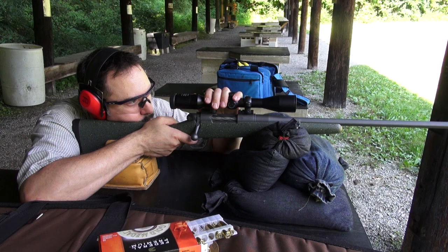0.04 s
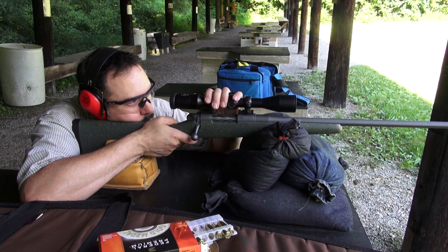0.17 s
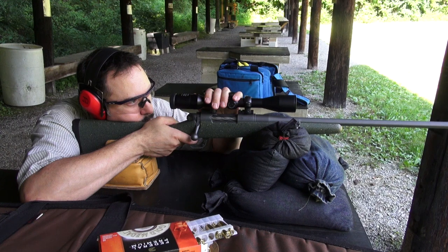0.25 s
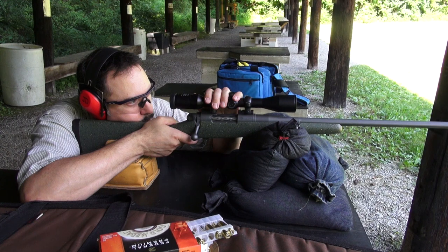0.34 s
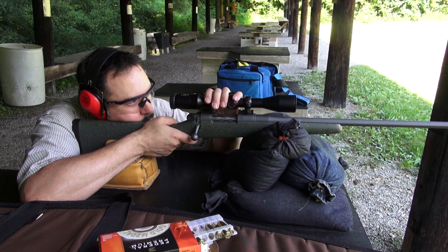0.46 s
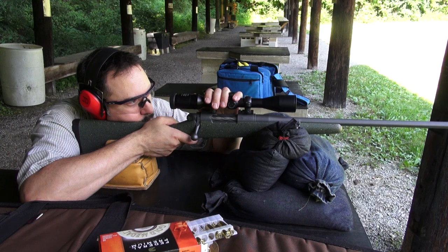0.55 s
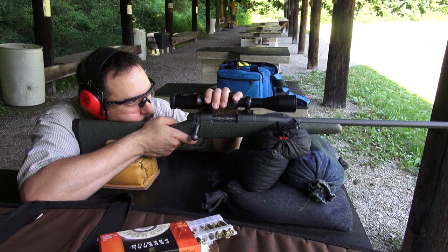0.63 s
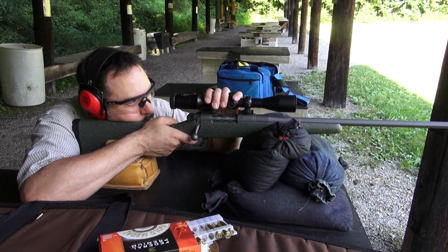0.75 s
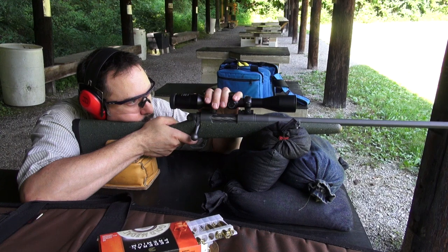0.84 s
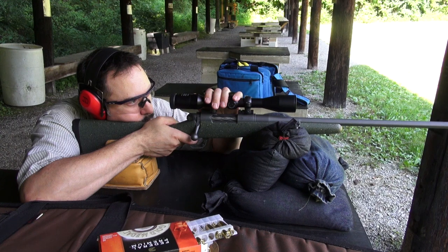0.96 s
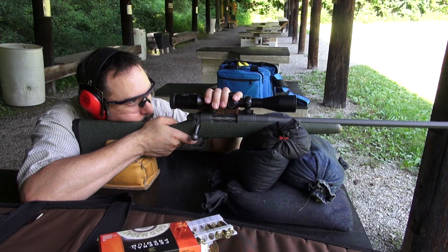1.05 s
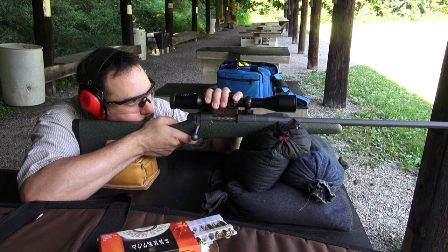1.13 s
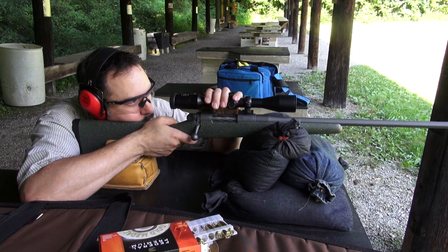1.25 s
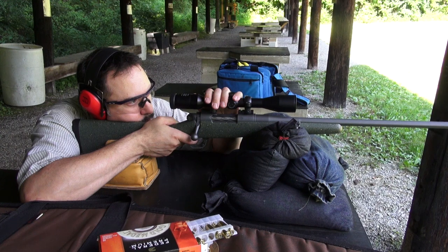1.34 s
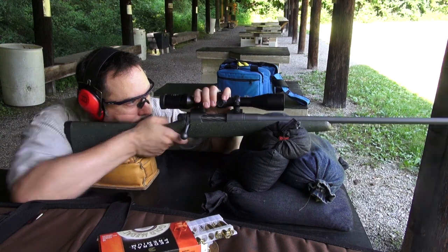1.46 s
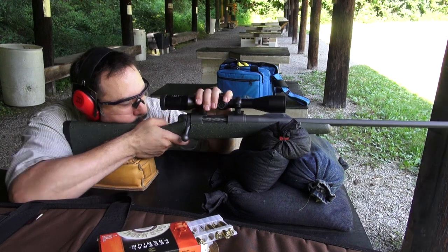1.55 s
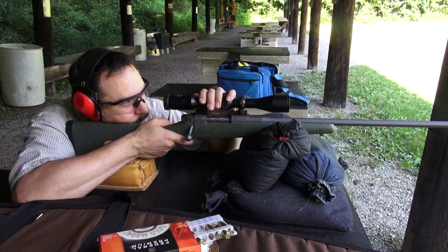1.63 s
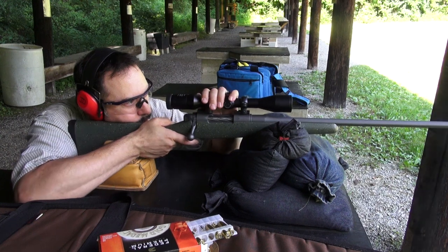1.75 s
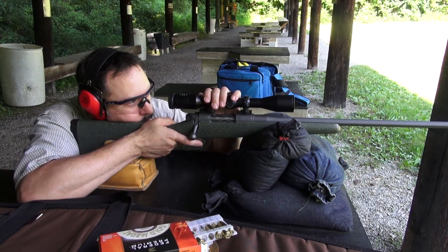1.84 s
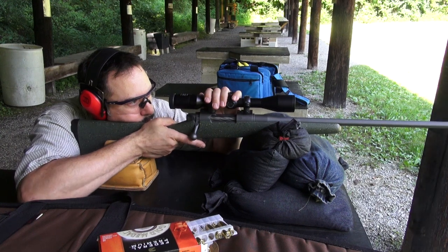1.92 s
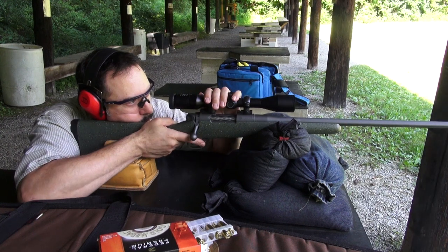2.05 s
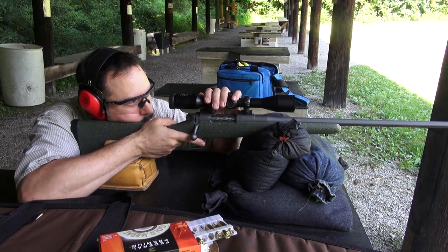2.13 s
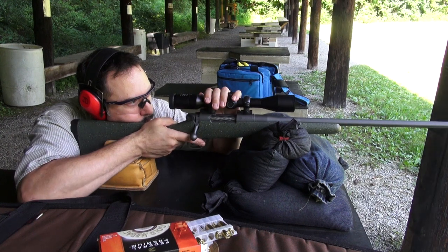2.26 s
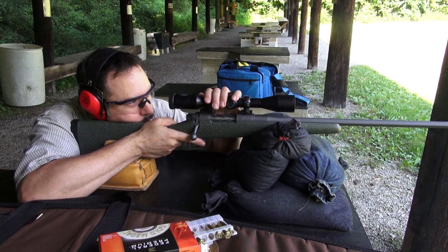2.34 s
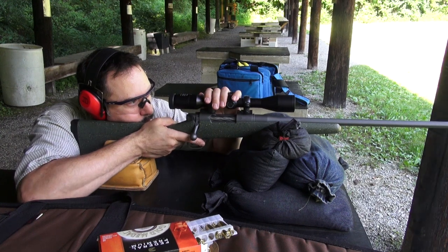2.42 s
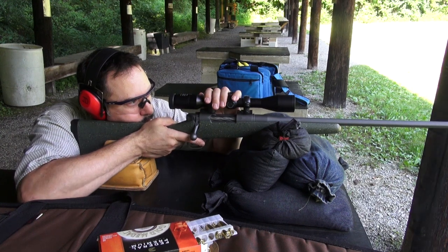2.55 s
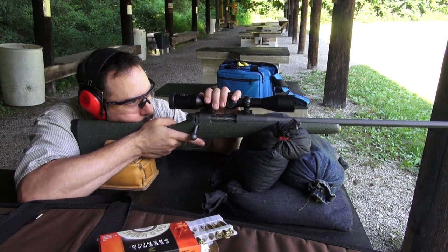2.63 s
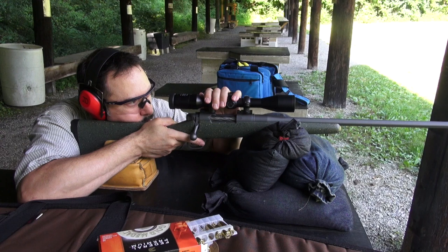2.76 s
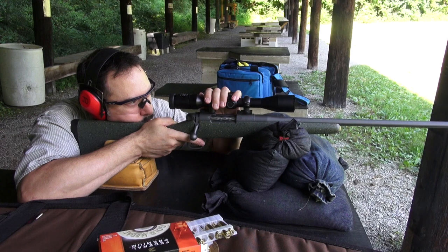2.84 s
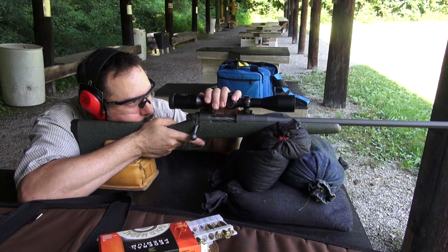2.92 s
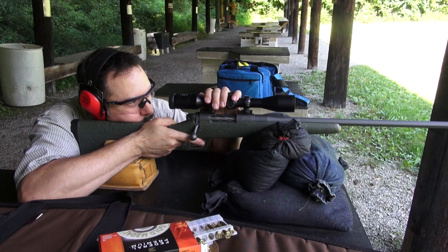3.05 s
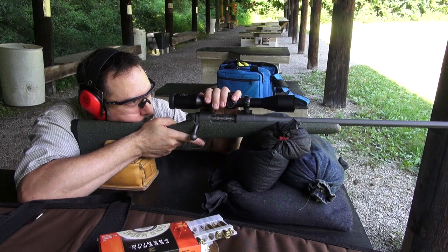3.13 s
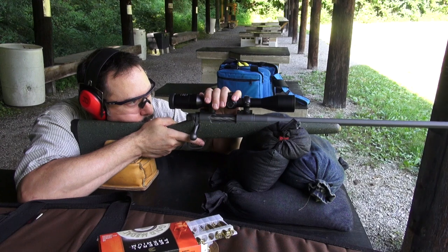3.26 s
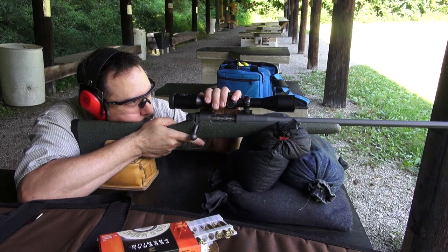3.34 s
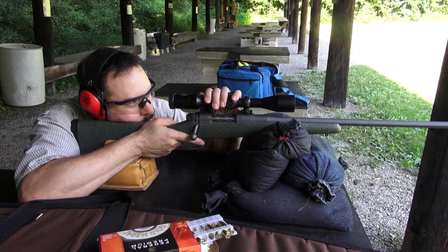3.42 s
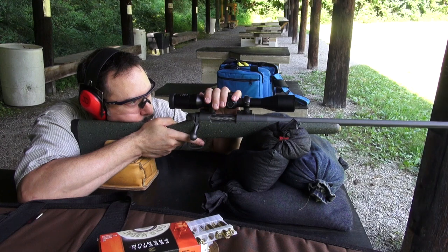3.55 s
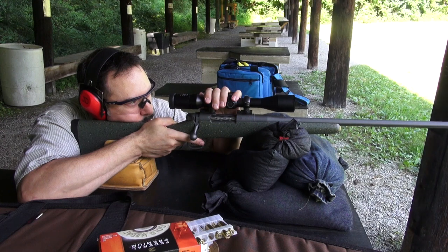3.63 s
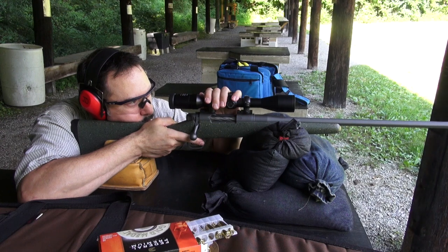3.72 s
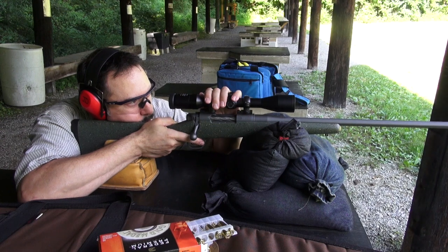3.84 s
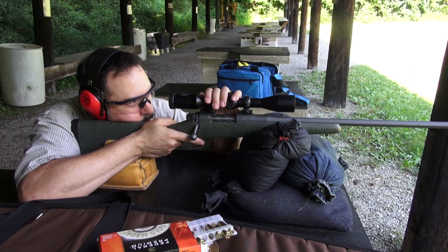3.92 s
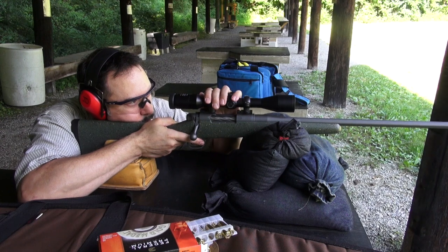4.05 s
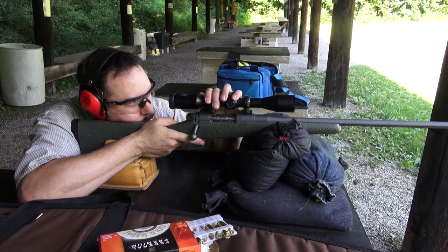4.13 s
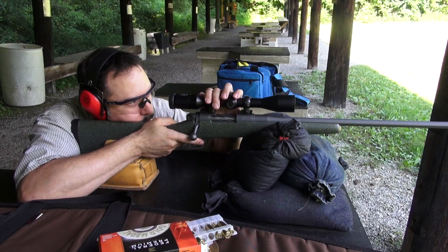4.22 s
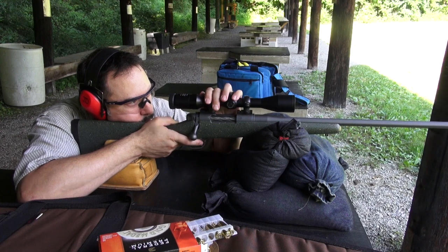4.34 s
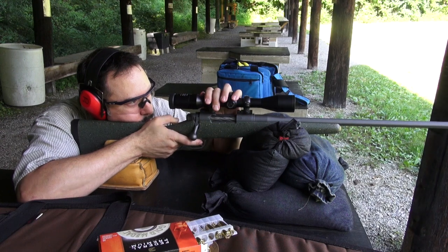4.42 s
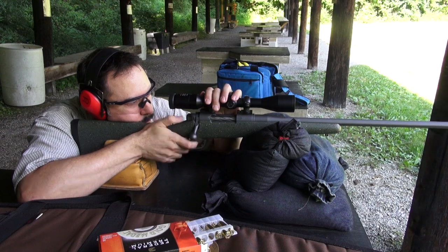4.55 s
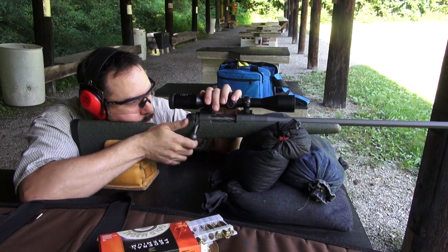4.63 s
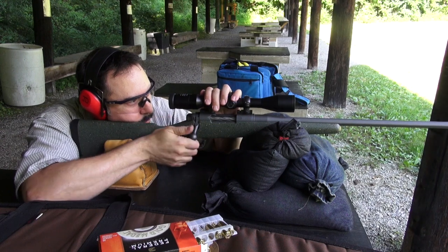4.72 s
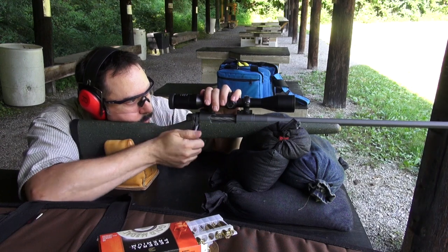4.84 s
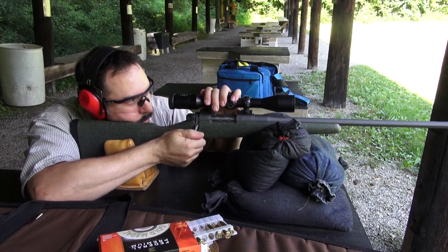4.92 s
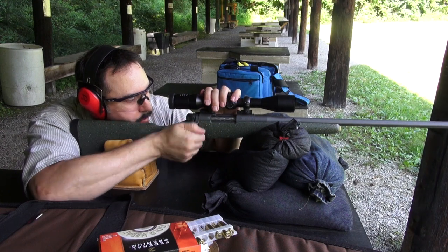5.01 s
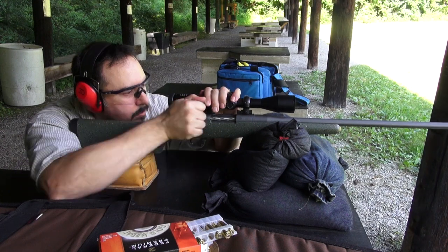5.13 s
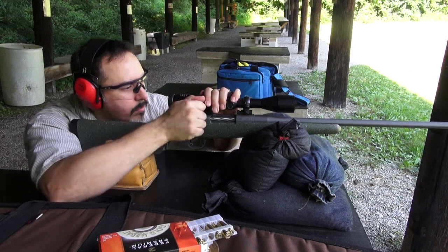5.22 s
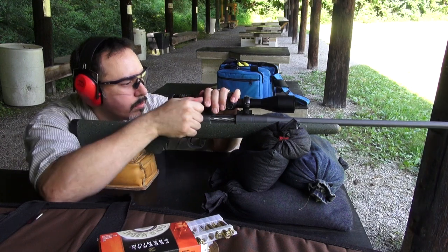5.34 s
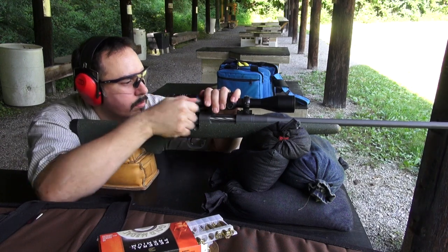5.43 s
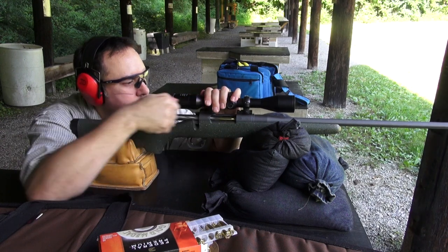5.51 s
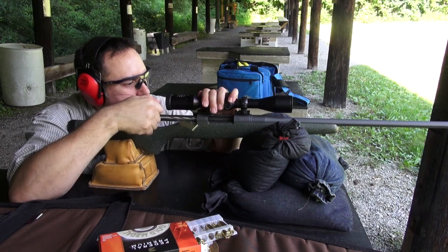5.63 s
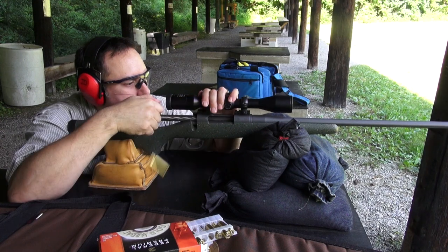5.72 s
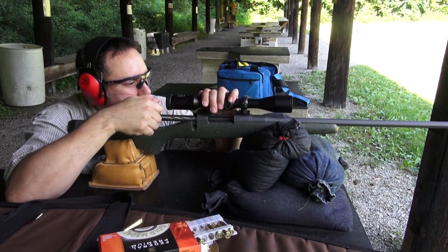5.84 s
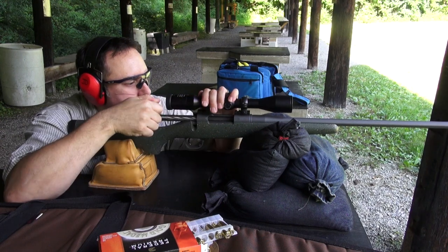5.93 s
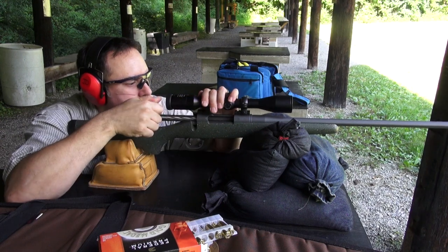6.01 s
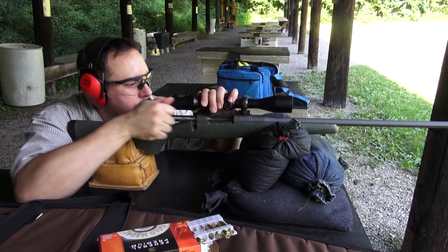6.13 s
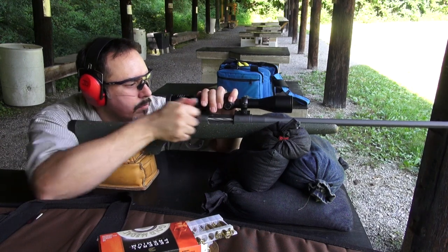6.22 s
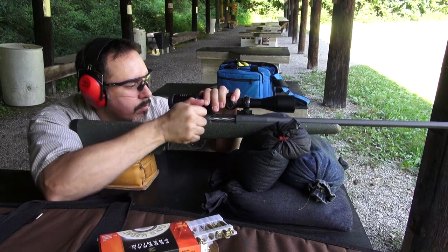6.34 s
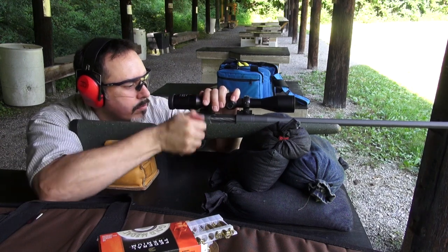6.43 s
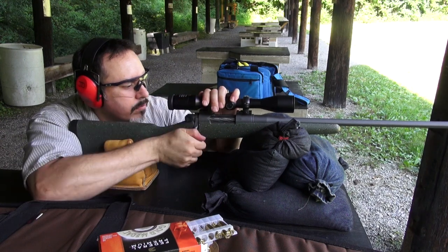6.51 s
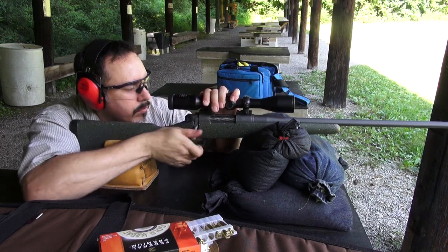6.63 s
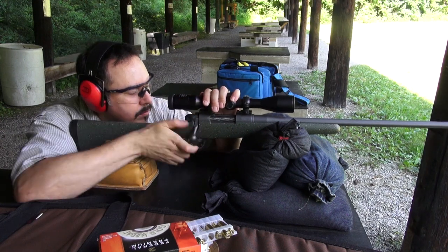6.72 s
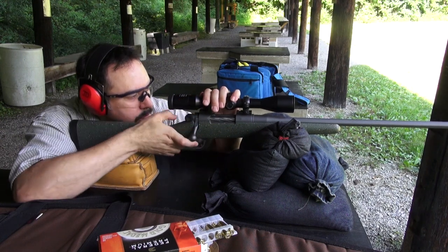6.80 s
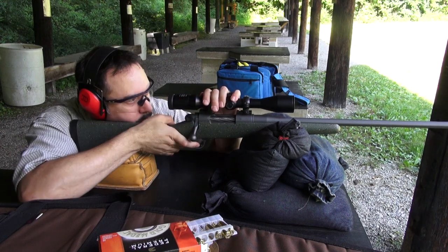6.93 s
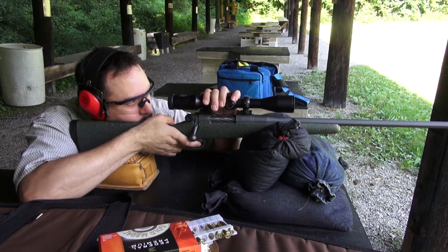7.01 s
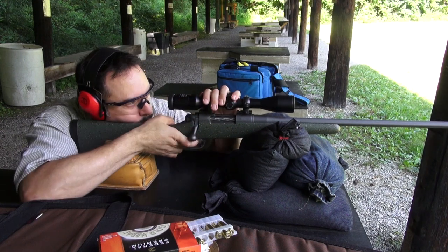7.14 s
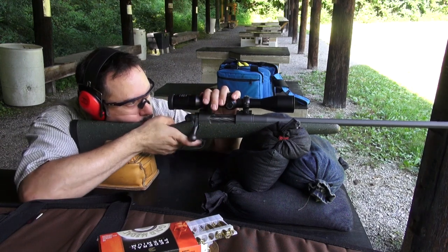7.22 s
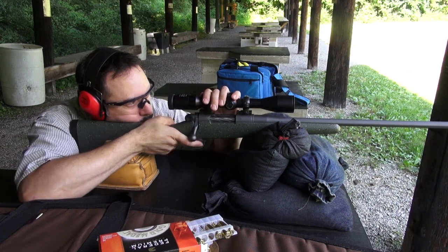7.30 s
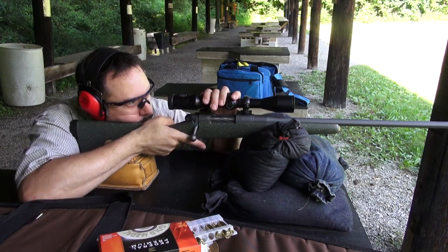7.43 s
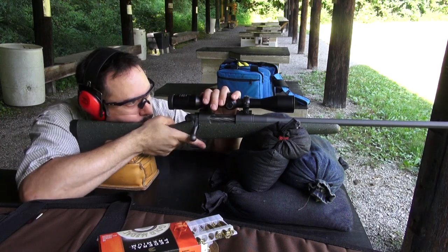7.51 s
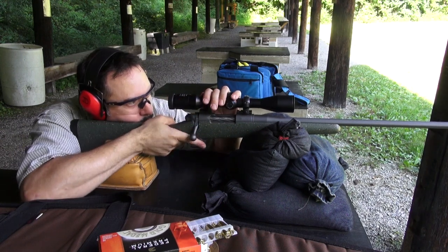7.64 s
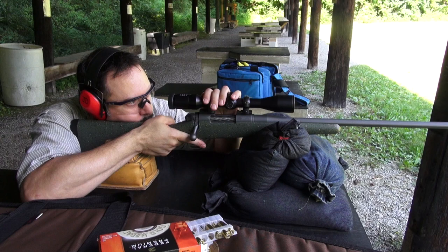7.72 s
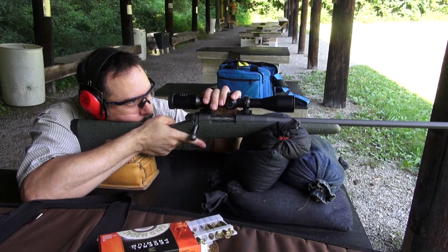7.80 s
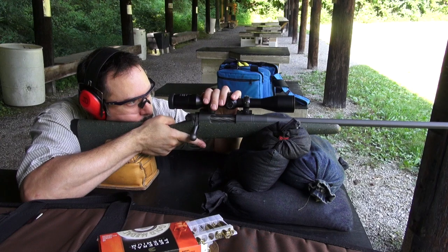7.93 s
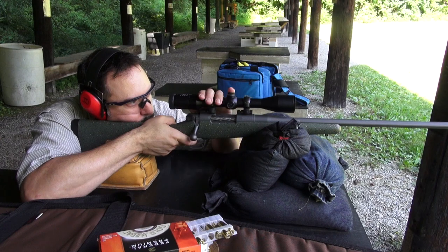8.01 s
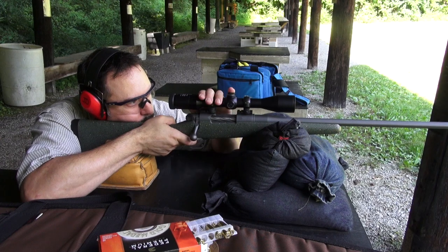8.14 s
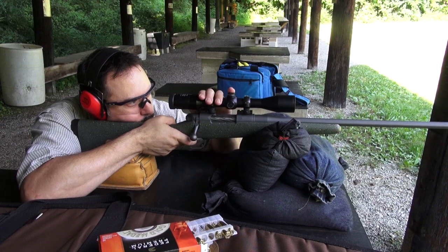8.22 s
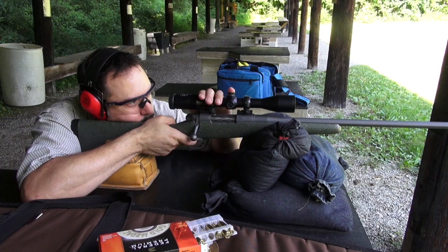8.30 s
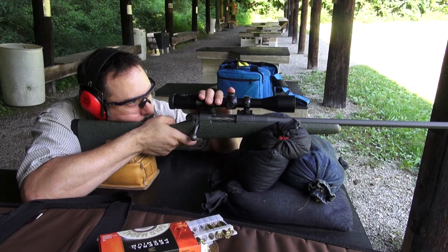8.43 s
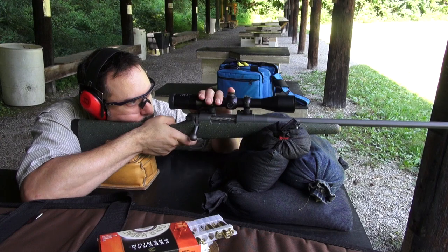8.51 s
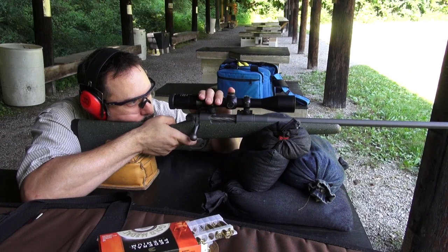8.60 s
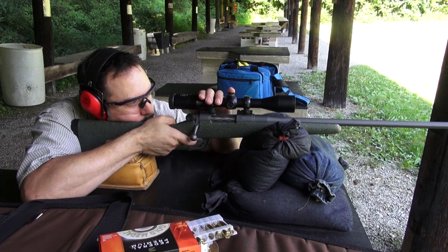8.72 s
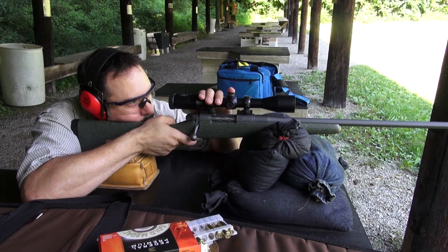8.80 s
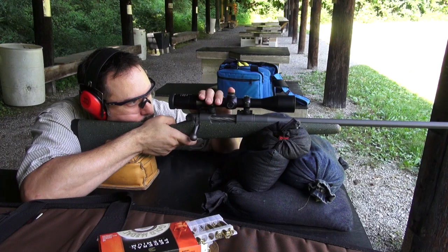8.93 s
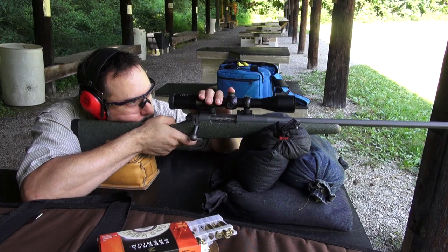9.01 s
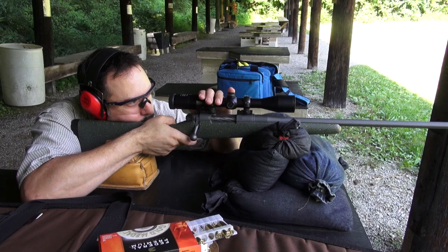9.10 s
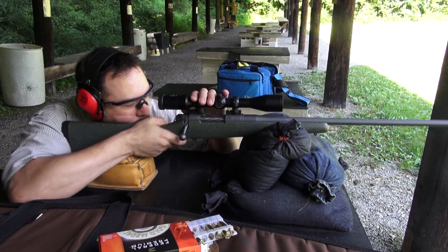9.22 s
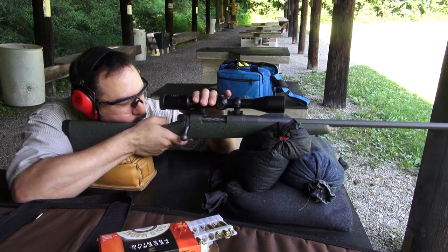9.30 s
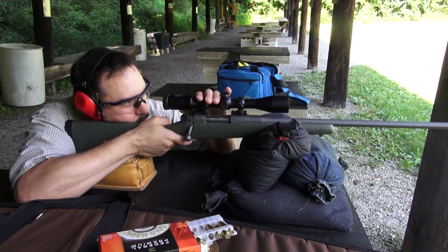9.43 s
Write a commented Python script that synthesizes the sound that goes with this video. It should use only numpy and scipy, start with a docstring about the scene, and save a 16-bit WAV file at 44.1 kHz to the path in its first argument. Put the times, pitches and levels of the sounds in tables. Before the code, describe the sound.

Two loud rifle shots echo across an outdoor range, with metallic clacks of the bolt being worked between them.

```python
"""A faint summer hiss, then a rifle shot from a bench under the roof of an outdoor range.
The blast overloads the microphone, fills the shelter and rolls back from the berm and the woods;
the gain control ducks the hiss and lets it creep back. The bolt is worked: impacts and friction
excite the modes of the steel action, and the spent brass case rings out and bounces on the bench.
A second shot follows."""
import sys
import numpy as np
from scipy import signal
from scipy.fft import rfft, irfft, next_fast_len
from scipy.io import wavfile
from scipy.ndimage import uniform_filter1d

SR = 44100
rng = np.random.default_rng(int(sys.argv[2]) if len(sys.argv) > 2 else 0)


def int16_out(signal):
    """Quantize to a 16-bit WAV file."""
    q = np.round(np.clip(np.atleast_2d(signal).T, -1, 1) * 32767)
    wavfile.write(sys.argv[1], SR, q.astype(np.int16))


N = 417186
T = np.arange(N) / SR

# hard tick of a metal contact: (frequency [Hz], relative level [dB])
TICK_SPECTRUM = [(4000, -31), (8000, -1.5), (10000, -2.5), (15500, -5)]
# dull thud of the stock: (frequency [Hz], relative level [dB])
THUD_SPECTRUM = [(30, -36), (150, -31), (350, -8.5), (650, 6), (1100, -6), (2000, -7), (5000, -37)]
# the bolt's travel, back then forward: (start [s], time of top speed [s], level then [dB])
BOLT_STROKES = [(5.536, 5.645, -39.5), (6.184, 6.266, -31)]


def amp(db):
    """Decibels to amplitude ratio."""
    return 10 ** (np.asarray(db) / 20)


def unit(x):
    """Normalise to rms 1."""
    return x / np.sqrt(np.mean(x ** 2) + 1e-20)


def unit_click(x):
    """Normalise to the energy of 3 ms at rms 1."""
    return x / np.sqrt(np.sum(x ** 2) / (SR * .003))


def along(points, hz):
    """Interpolate (frequency [Hz], value) points on a logarithmic frequency axis."""
    f, v = np.transpose(points)
    return np.interp(np.log(hz + 1), np.log(f + 1), v)


def add(track, s, x):
    """Superposition: sum x into the track at s seconds."""
    part = track[max(round(s * SR), 0):][:len(x)]
    part += x[:len(part)]


def filtered(x, response):
    """Linear filtering: multiply the spectrum by a frequency response."""
    n = x.shape[-1]
    m = next_fast_len(n + 4096)
    return irfft(rfft(x, m) * response(np.fft.rfftfreq(m, 1 / SR)), m)[..., :n]


def noise(spectrum, size):
    """Spectral shaping: coloured noise of rms 1."""
    return unit(filtered(rng.standard_normal(size), lambda hz: amp(along(spectrum, hz))))


def damped(x, t60s):
    """Frequency-dependent damping: each band decays exponentially at its own rate."""
    hz, t, bands = signal.stft(x, SR, nperseg=512)
    decay = amp(-60 * t / np.maximum(along(t60s, hz), .01)[:, None])
    return signal.istft(bands * decay, SR, nperseg=512)[1][:len(x)]


def resonance(hz, centre, width):
    """Response of a damped oscillator, gain 1 at its centre."""
    return 1j * hz * width / (centre ** 2 - hz ** 2 + 1j * hz * width)


def strike(t60, attack=0.00053):
    """Impact envelope: a fast rise, then free exponential decay."""
    t = np.arange(SR // 5) / SR
    return amp(-60 * t / t60) * (1 - np.exp(-t / attack))


def catches(rate):
    """Poisson process: random impulses, on average `rate` a second, at rms 1."""
    return unit((rng.random(N) < rate / SR) * rng.standard_normal(N))


def summer_air(start_db=-65, fade_db_per_s=0.43):
    """Ambient noise: a thin, high hiss that slowly fades."""
    # (frequency [Hz], relative level [dB])
    spectrum = [(100, -7.5), (600, -10), (1100, -13.5), (2000, -18), (2600, -5.5), (3200, -2.5), (5800, -2),
                (7000, 2.5), (7800, -6), (9000, -23), (13000, -28)]
    return amp(start_db - fade_db_per_s * T) * noise(spectrum, N)


def electronics(noise_db=-78):
    """Self-noise of the microphone's circuit: a broadband floor and a steady buzz."""
    # noise floor: (frequency [Hz], relative level [dB])
    floor = [(20, -7), (50, 1.5), (100, -3), (200, -6), (400, -5.5), (700, -8), (850, -4.5), (1100, -10),
             (2000, -12), (9000, -17), (15500, -19.5)]
    # buzz: (frequency [Hz], rms level [dB])
    partials = [(100.3, -86), (150.45, -86), (200.6, -90), (250.75, -93), (845, -95), (13378, -93)]
    buzz = sum(amp(db) * np.sqrt(2) * np.cos(2 * np.pi * hz * T) for hz, db in partials)
    return amp(noise_db) * noise(floor, N) + buzz


def action(hz):
    """Modal response of the steel receiver and bolt, summed with alternating signs."""
    # (frequency [Hz], bandwidth [Hz], level [dB])
    modes = [(1140, 320, -7), (1610, 380, -3.5), (2030, 360, -0.5), (3013, 360, 0.5), (3750, 470, -0.5),
             (4516, 580, 3), (5160, 1100, -2.5), (6747, 700, -3.5), (8600, 900, -10.5)]
    return sum((-1) ** k * amp(db) * resonance(hz, c, w) for k, (c, w, db) in enumerate(modes))


def handling(start=4.55, end=6.5, db=-73, rise_db=12, tick_rate=160, stock_db=-2):
    """Impulse excitation: fingers and loose parts tick on action and stock as the hand takes hold."""
    grip_db = np.interp(T, [start, BOLT_STROKES[0][0]], [db - rise_db, db])
    ticks = filtered(catches(tick_rate), lambda hz: action(hz) + amp(stock_db + along(THUD_SPECTRUM, hz)))
    return amp(grip_db) * (T > start) * (T < end) * unit(ticks)


def bolt_slide(catch_rate=1200, smooth=0.42, tick_db=-17, stock_db=-8, rise_db=22, stop_db_per_s=448):
    """Sliding friction: tiny catches of steel excite action and stock, louder as the bolt speeds up."""
    travel = np.zeros(N)
    for start, fastest, db in BOLT_STROKES:
        swell_db = np.interp(T, [start, fastest], [-rise_db, 0])
        stop_db = stop_db_per_s * np.maximum(T - fastest, 0)
        travel += (T > start) * amp(db + swell_db - stop_db)
    friction = catches(catch_rate) + smooth * rng.standard_normal(N)
    rub = filtered(friction, lambda hz: action(hz) + amp(tick_db + along(TICK_SPECTRUM, hz))
                   + amp(stock_db + along(THUD_SPECTRUM, hz)))
    return travel * unit(rub)


def knock(hz, t60, thud_db):
    """Heavily damped vibration: one low mode over the thud of the stock or bench."""
    blow = strike(t60, attack=0.0013)
    tone = np.sin(2 * np.pi * hz * np.arange(len(blow)) / SR)
    thud = noise(THUD_SPECTRUM, len(blow))
    return unit_click(unit_click(tone * blow) + amp(thud_db) * unit_click(thud * blow))


def clack(ring_db, tick_db, knock_db):
    """Hard impact: one contact gives a brief metallic ring, a tick and a knock."""
    ring = unit_click(filtered(rng.standard_normal(SR // 5) * strike(t60=0.017), action))
    tick = unit_click(noise(TICK_SPECTRUM, SR // 5) * strike(t60=0.0099))
    knock_hz = 1019 * np.exp(.14 * rng.standard_normal())  # varies with the spot that is hit
    body = knock(knock_hz, t60=.024, thud_db=-3)
    return amp(ring_db) * ring + amp(tick_db) * tick + amp(knock_db) * body


def case_ring(tumble_hz=33, tumble_depth=0.55, split_hz=11000):
    """Free vibration of the ejected brass case, modulated by its directivity as it tumbles."""
    # (frequency [Hz], level [dB], decay time T60 [s])
    modes = [(9819, 0, .34), (12800, -24, .22), (14380, -12, .24), (14470, 0, .16)]
    # blows to the case: (time [s], level below split_hz [dB], level above [dB])
    blows = [(5.613, -31, -52), (5.634, -45, -37), (5.672, -46, -22), (5.884, -60, -72)]
    out = np.zeros(N)
    for hz, db, t60 in modes:
        energy = np.zeros(N)
        for s, low_db, high_db in blows:
            blow_db = low_db if hz < split_hz else high_db
            add(energy, s, amp(blow_db + db - 60 * T[:SR // 2] / t60) ** 2)
        # two radiation lobes sweep past in each turn
        facing = np.abs(np.cos(2 * np.pi * (tumble_hz * T + rng.random())))
        out += np.sqrt(energy) * facing ** tumble_depth * np.sin(2 * np.pi * hz * T)
    return out


def case_bounces(start=5.977, db=-30.5, hop_s=.0167, loss_db=5):
    """Inelastic collisions: the case hits the bench three times at even intervals, each time weaker."""
    out = np.zeros(N)
    for k in range(3):
        bench = knock(hz=620, t60=0.015, thud_db=-3.5)
        metal = clack(ring_db=-21, tick_db=-40, knock_db=-12)
        add(out, start + k * hop_s, amp(db - k * loss_db) * (bench + metal))
    return out


def reload_impacts(rebound_s=.003, rebound_db=-11, chatter_s=.0085, scatter_db=1.5):
    """Impact and elastic rebound: clicks of the bolt and of the brass case landing, rattles and bumps."""
    # clicks of bolt and case: (time [s], ring [dB], tick [dB], knock [dB])
    contacts = [(5.059, -45.5, -60, -63), (5.0848, -54, -47, -51), (5.161, -39, -44, -56),
                (5.181, -50, -70, -46), (5.188, -26, -36, -43), (5.1971, -24, -29.5, -33.5),
                (5.467, -61, -56, -64), (5.536, -29, -42, -39), (5.6422, -17.5, -21, -21.5),
                (5.6712, -36.5, -47, -60), (5.8653, -48, -65, -46.5), (5.8836, -43.5, -49, -42),
                (6.168, -57.5, -53, -72), (6.187, -31, -37, -46), (6.2003, -34, -53.5, -48),
                (6.244, -33, -52, -46), (6.2678, -22, -22, -37.5), (6.271, -24.5, -20, -42),
                (6.3134, -33, -53, -48), (6.3293, -10.5, -14, -25.5), (6.483, -38, -65, -46),
                (6.572, -27, -33, -39.5)]
    # brass chatters on its way out and in: (time [s], duration [s], ring [dB], tick [dB], knock [dB])
    rattles = [(5.613, .026, -27, -31.5, -43.5), (6.256, .014, -24.5, -23.5, -39),
               (6.285, .014, -30.5, -45, -43)]
    # the handle knocks the stock at each end of its swing: (time [s], level [dB])
    handle_stops = [(5.2, -33), (6.572, -28.5)]
    # soft bumps on stock, rest and mat: (time [s], level [dB], frequency [Hz], decay time T60 [s])
    bumps = [(4.57, -66, 450, .04), (5.089, -46, 584, 0.031), (5.498, -52, 900, .07),
             (5.866, -56, 330, 0.045), (5.883, -29, 420, 0.025), (6.331, -44, 90.2, 0.039),
             (6.62, -65, 56, 0.26), (7.12, -59.5, 380, 0.043)]
    out = np.zeros(N)
    for s, *levels in contacts:
        add(out, s, clack(*levels))
        add(out, s + rebound_s, amp(rebound_db) * clack(*levels))
    for s, duration, *levels in rattles:
        for k in range(round(duration / chatter_s)):
            add(out, s + k * chatter_s, amp(scatter_db * rng.standard_normal()) * clack(*levels))
    for s, db in handle_stops:
        add(out, s, amp(db) * knock(hz=616, t60=0.032, thud_db=-7))
    for s, db, hz, t60 in bumps:
        band = unit(filtered(rng.standard_normal(SR // 5), lambda f: resonance(f, hz, hz / 2) ** 2))
        add(out, s, amp(db) * band * strike(t60))
    return out


def shelter(x, roof_db=-16, bench_db=-19, bench_delay=0.012, bench_t60=0.012, block=4096):
    """Short bench reflection and roof reverberation, with a fresh random tail for each block."""
    # reverberation under the roof: (frequency [Hz], decay time T60 [s])
    roof_t60 = [(200, 0.31), (1000, 0.35), (5000, 0.22), (14000, 0.15)]
    roof_spectrum = [(100, 0), (700, -3.5), (4500, 1.5), (9000, 0.5), (15000, 4.5)]
    out, t = x.copy(), np.arange(SR // 3) / SR
    for start in range(0, N, block):
        part = x[start:start + block]
        if np.abs(part).max() < 1e-3:
            continue
        roof = damped(noise(roof_spectrum, len(t)), roof_t60) * (1 - np.exp(-t / 0.00115))
        bench = rng.standard_normal(len(t)) * amp(-60 * t / bench_t60)
        echo = amp(roof_db) * roof / np.linalg.norm(roof)
        add(echo, bench_delay, amp(bench_db) * bench / np.linalg.norm(bench))
        add(out, start / SR, signal.fftconvolve(part, echo))
    return out


def microphone_recovery(t, db=-45, t60=1.7):
    """Overload recovery: a slow subsonic swell that dies away as the microphone settles."""
    spectrum = [(12, 0), (30, -12), (60, -24), (200, -30.5), (600, -69.5)]
    return amp(db - 60 * t / t60) * noise(spectrum, len(t))


def blast_tail(t, blast_db=14, berm_db=-7, berm_delay=.078, berm_swell_s=.045,
               woods_db=-20, woods_rise_s=0.074):
    """Reflection and scattering from roof, berm and woods, plus the microphone's recovery."""
    # roar under the roof, berm echo, roll in the woods: (frequency [Hz], relative level [dB])
    blast_spectrum = [(30, -19), (70, -17.5), (130, -9.5), (300, -0.5), (520, -1), (850, 0), (1400, -6),
                      (2500, -7.5), (5000, -9), (8000, -16), (15000, -27)]
    berm_spectrum = [(30, -20), (70, -40), (120, -13), (220, -10.5), (350, -6), (750, -5.5), (1100, -10),
                     (2000, -15), (4500, -20.5), (8000, -30.5), (15000, -43)]
    woods_spectrum = [(30, -22), (120, -13.5), (270, -17.5), (420, -7.5), (560, -1.5), (900, -5.5),
                      (2000, -8), (4500, -18), (9000, -35)]
    # their damping: (frequency [Hz], decay time T60 [s])
    blast_t60 = [(100, 0.13), (700, 0.23), (4000, 0.18), (14000, 0.16)]
    berm_t60 = [(100, 0.53), (600, 0.87), (3000, 1), (7000, 1), (14000, 0.72)]
    woods_t60 = [(150, 1.6), (600, 2.33), (1500, 1.85), (3500, 1.6), (9000, .9)]
    # standing waves between bench, floor and roof: (frequency [Hz], bandwidth [Hz], gain [dB])
    bay_modes = [(345, 13, 2.5), (450, 120, 3.5), (595, 26, 3), (672.6, 54, 2.5), (764, 26, 3),
                 (884, 12, 2), (1070, 13, 4), (1264, 20, 5), (1723, 20, 3), (3060, 25, 5.5)]
    roar = damped(noise(blast_spectrum, len(t)), blast_t60)
    roll = damped(noise(woods_spectrum, len(t)), woods_t60) * (1 - np.exp(-t / woods_rise_s))
    out = amp(blast_db) * roar + amp(woods_db) * roll + microphone_recovery(t)
    # the echo swells as the slope answers part by part
    echo = damped(noise(berm_spectrum, len(t)), berm_t60) * np.minimum(t / berm_swell_s, 1)
    add(out, berm_delay, amp(berm_db) * echo)
    return filtered(out, lambda hz: 1 + sum((amp(db) - 1) * resonance(hz, c, w) for c, w, db in bay_modes))


def shots(crack_db=16, crack_t60=0.044, pin_db=-20, pin_t60=0.028, pin_lead_s=0.0029):
    """Impulsive source: the firing pin rings the action, then the muzzle crack excites the range."""
    # (time [s], level [dB])
    firings = [(1.5198, 2), (9.2613, 3)]
    crack_spectrum = [(200, -9.5), (1500, -2.5), (6000, 1.0), (15000, -17.5)]
    out, t = np.zeros(N), np.arange(3 * SR) / SR
    tail = blast_tail(t)  # rifle and microphone stay put, so both shots share it
    for s, db in firings:
        pin = unit(filtered(rng.standard_normal(len(t)), action)) * amp(pin_db - 60 * t / pin_t60)
        add(out, s - pin_lead_s, pin)
        crack = noise(crack_spectrum, len(t)) * amp(crack_db - 60 * t / crack_t60)
        add(out, s, amp(db) * (crack + tail))
    return out


def scene():
    """Superposition: all sources reach the two close microphone ports alike."""
    gunfire = shots()
    reloading = shelter(reload_impacts() + case_bounces() + bolt_slide() + handling())
    mid = gunfire + reloading + case_ring() + summer_air()
    return np.array([mid, mid])


def record(dry, overload_db=6, hardness=4, low_cut_hz=110, threshold_db=-7, attack_s=.009,
           release_db_per_s=3.0, ceiling=0.7, side_db=-22, top_hz=16000):
    """Nonlinear transduction: the microphone saturates, the gain control ducks, the converter clips."""
    x = dry.mean(axis=0)
    x = x / (1 + np.abs(x / amp(overload_db)) ** hardness) ** (1 / hardness)
    x = filtered(x, lambda hz: 1j * hz / (low_cut_hz + 1j * hz))
    # the gain falls fast and recovers slowly
    power = np.abs(uniform_filter1d(x ** 2, size=128))
    excess_db = np.maximum(10 * np.log10(power + 1e-12) - threshold_db, 0)
    held_db = np.maximum.accumulate(excess_db + release_db_per_s * T) - release_db_per_s * T
    pole = np.exp(-1 / (attack_s * SR))
    duck_db = signal.lfilter([1 - pole], [1, -pole], held_db)
    x = np.clip(x * amp(-duck_db), -ceiling, ceiling) + electronics()
    # a delayed, low-passed copy gives slight stereo width
    side = amp(side_db) * filtered(x, lambda hz: np.exp(-2j * np.pi * hz * 0.0032) / (1 + 1j * hz / 1500))
    return filtered(np.array([x + side, x - side]), lambda hz: 1 / (1 + (hz / top_hz) ** 160))


dry = scene()
out = record(dry)
int16_out(out)
```